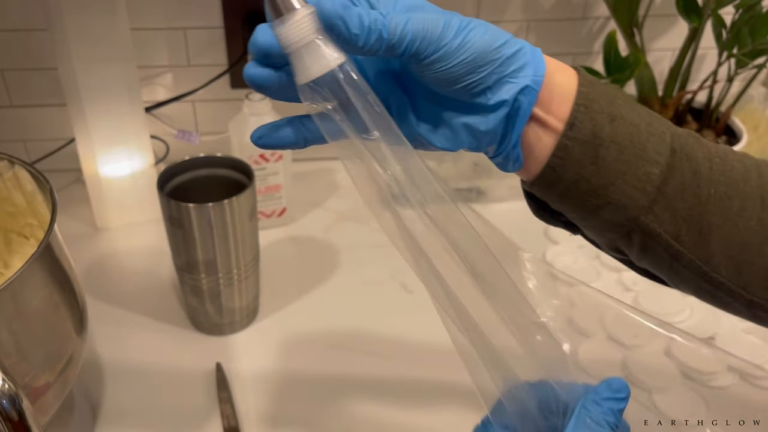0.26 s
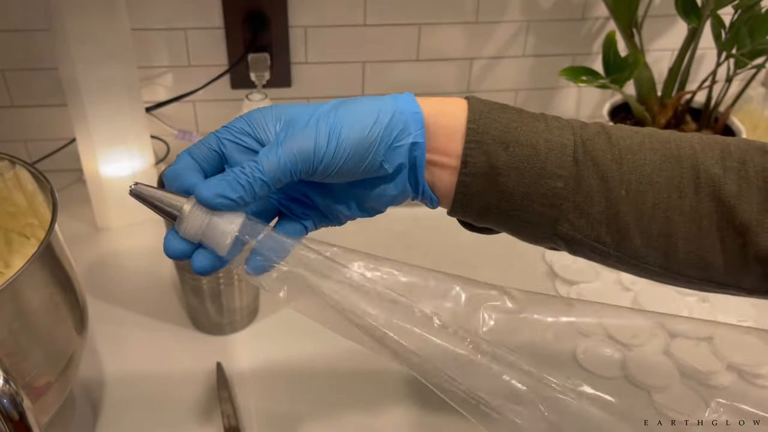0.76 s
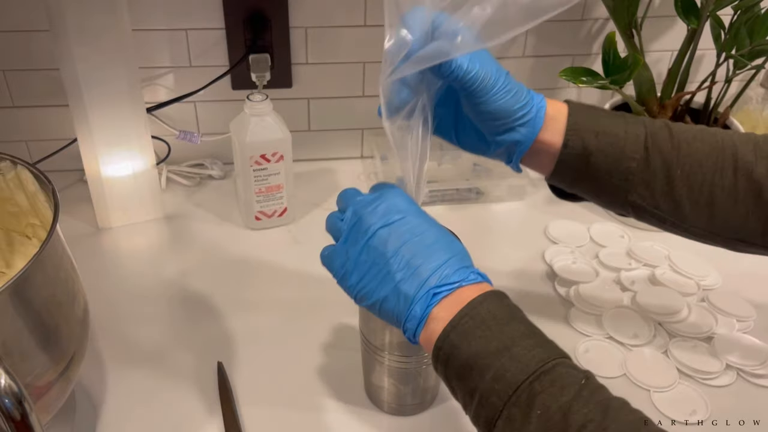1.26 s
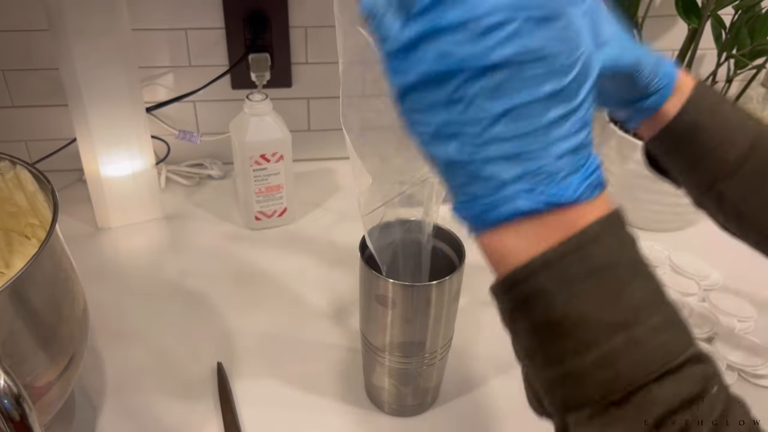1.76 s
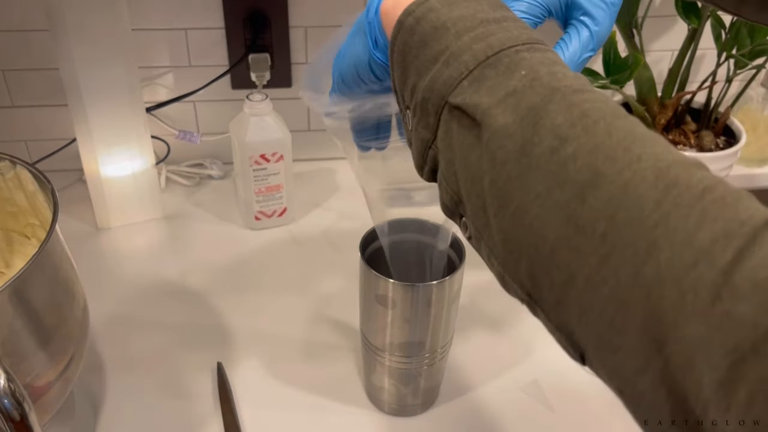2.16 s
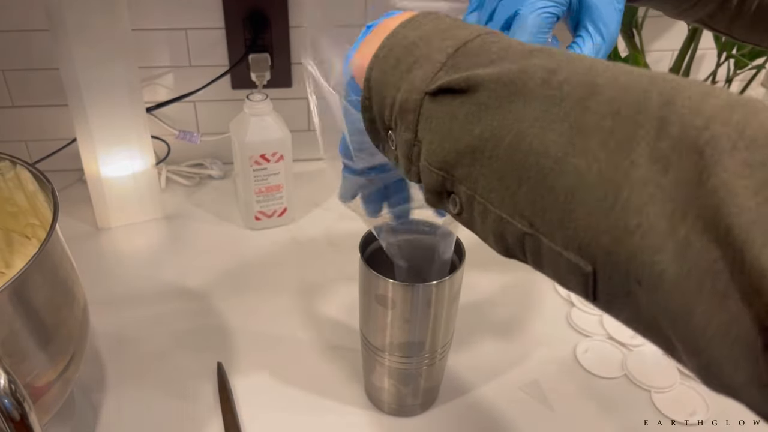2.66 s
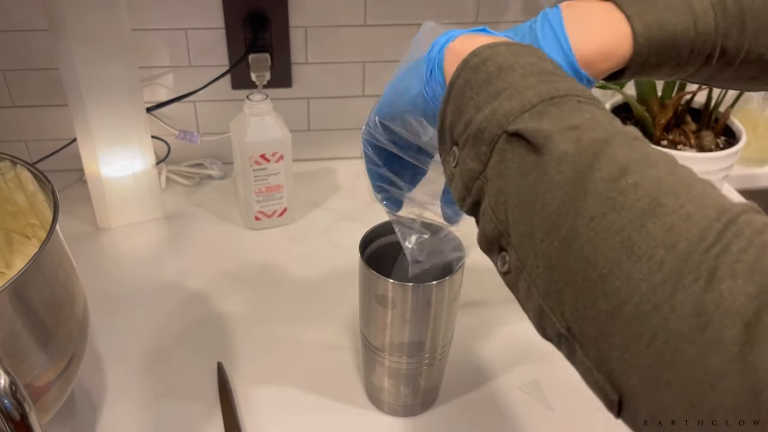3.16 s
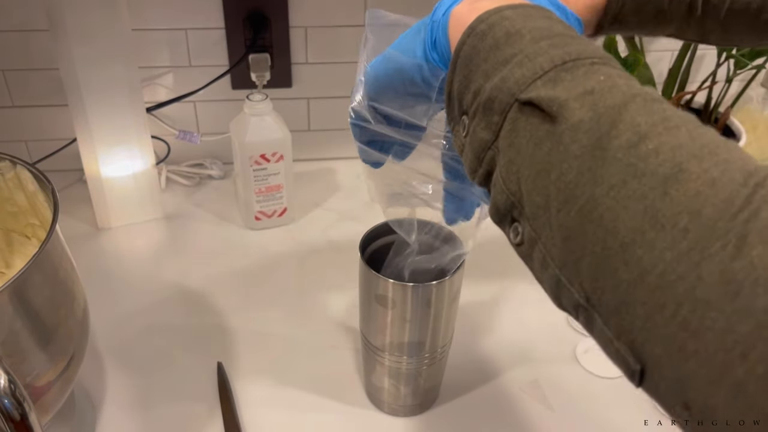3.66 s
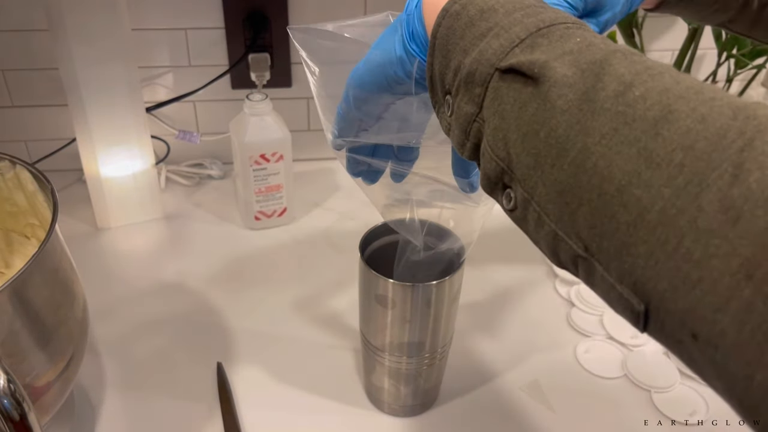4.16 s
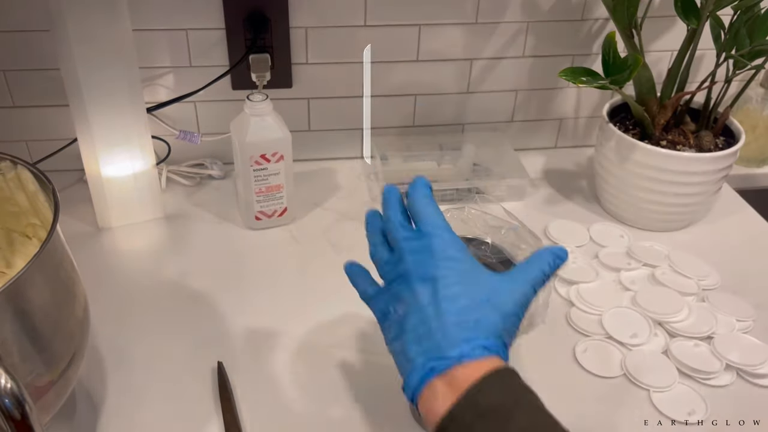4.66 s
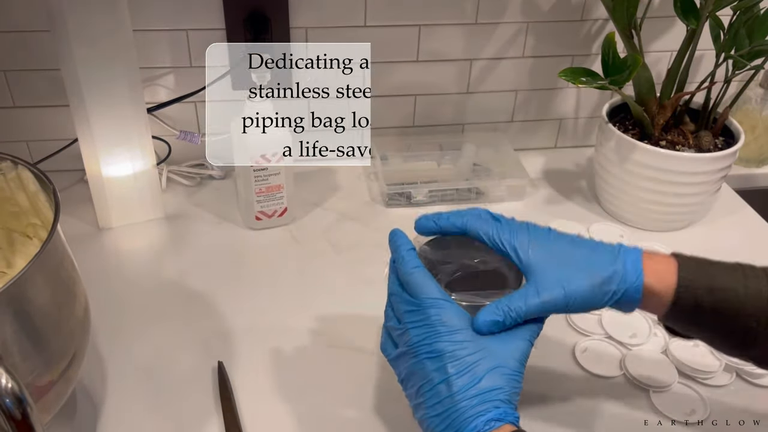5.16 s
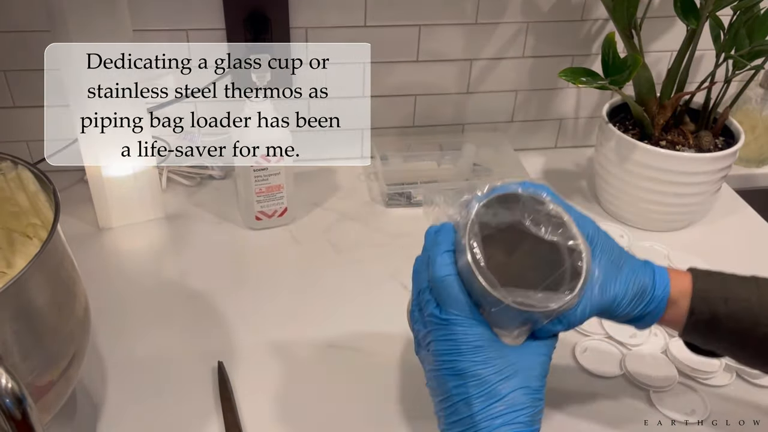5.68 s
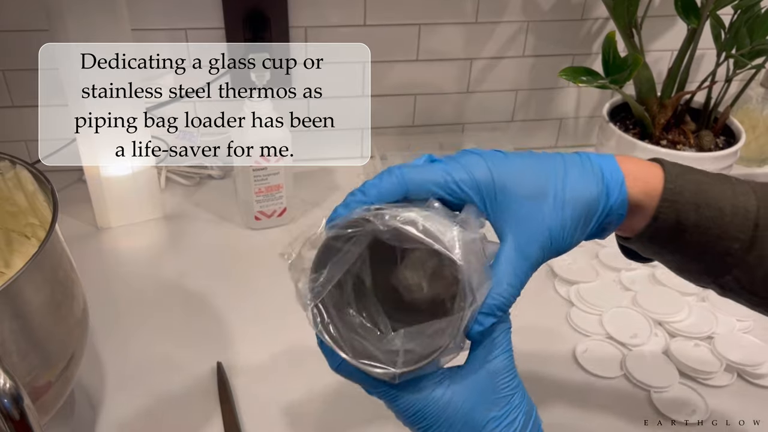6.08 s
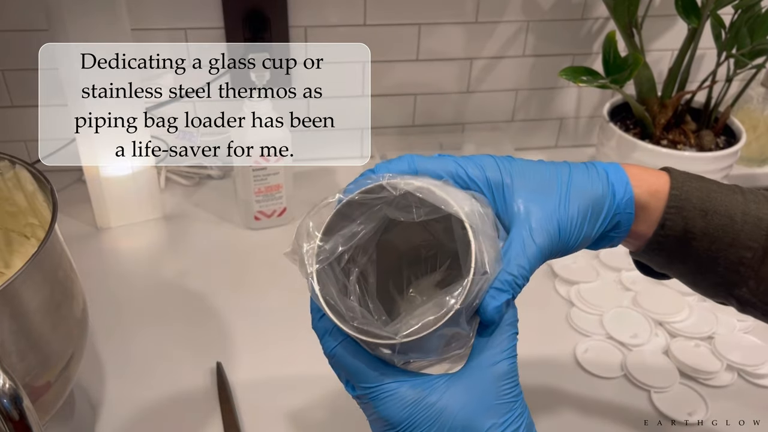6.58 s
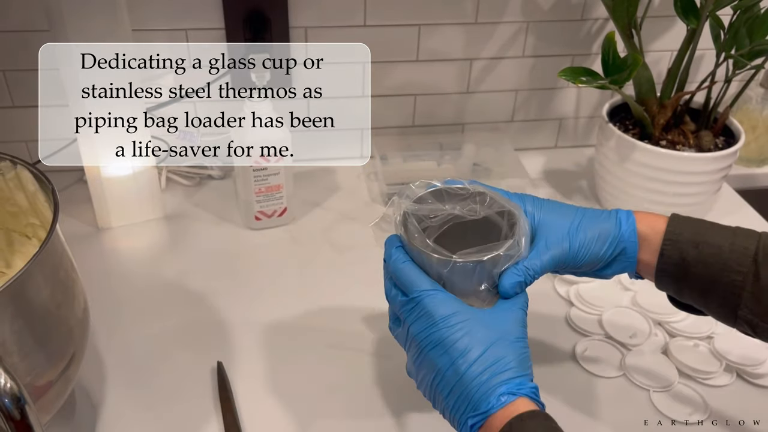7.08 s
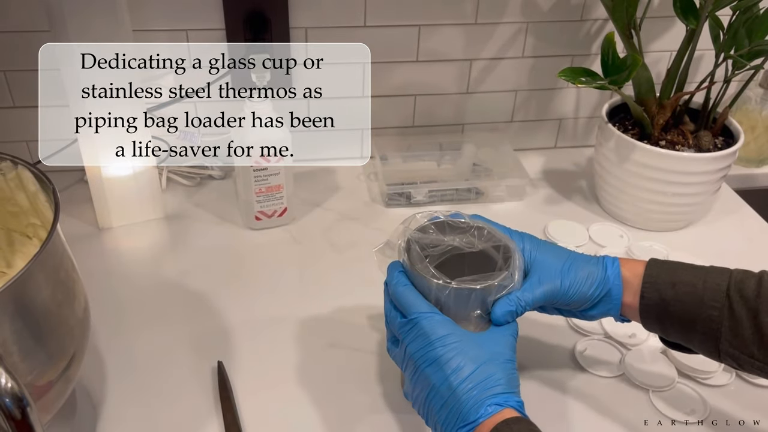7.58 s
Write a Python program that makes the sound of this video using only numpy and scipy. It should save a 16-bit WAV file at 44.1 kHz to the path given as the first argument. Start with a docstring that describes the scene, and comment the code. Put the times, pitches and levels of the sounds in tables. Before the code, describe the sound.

Close, dry crinkles and pops of plastic film start busy, drop almost to nothing, then return as fuller rustling with soft bag flaps and tiny metal ticks from a steel cup. An abrupt edit leads to a short burst of crackle, then quiet handling. Late on, the cup lands with a short hollow metallic thud, followed by a softer contact. Small hard-walled kitchen, low air noise, slightly muffled extreme treble.

```python
"""Thin plastic film crackles and snaps as gloved hands smooth a piping bag: band noise in grains, plus sharp bursts.
The bag's metal tip is lowered into a steel cup and the film folded over the rim: tip and cup are damped modes,
struck by clicks and dragged by friction noise. An edit skips ahead; the cup is set down on a counter, which
answers with dying noise. Feedback delays give a small tiled room; steady air noise and a faint tone make it quiet."""
import sys
import numpy as np
from scipy import signal
from scipy.fft import rfft, irfft, next_fast_len
from scipy.io import wavfile

SR = 44100
rng = np.random.default_rng(int(sys.argv[2]) if len(sys.argv) > 2 else 0)


def put_to_file(sound):
    """Save the sound as 16-bit audio at rate SR, in the file named by the first command-line argument."""
    columns = np.atleast_2d(sound).T  # one column per channel
    safe = np.clip(columns, -1, 1)
    whole_steps = np.round(safe * 32767)
    wavfile.write(sys.argv[1], SR, whole_steps.astype(np.int16))


N = 345303
EDIT_S = 4.537

# How firmly the hands work the film, one list before and one after the edit.
# Each row: time in seconds, crackle level in dB.
HANDLING = [
    [(0.0, -40), (0.34, -57), (0.78, -85), (1.02, -72.5), (1.6, -54.5), (1.78, -61.5), (1.94, -65.5),
     (1.99, -47), (2.07, -39), (2.18, -36.5), (2.28, -37.5), (2.45, -37.5), (2.64, -45), (2.89, -43.5),
     (3.57, -46.5), (4.09, -49), (4.38, -51.5), (4.53, -52.5)],
    [(4.55, -45.5), (4.72, -81), (5.06, -43), (5.26, -46), (5.4, -37.5), (5.5, -39), (5.66, -61),
     (5.86, -66.5), (6.17, -79.5), (6.42, -79.5), (6.8, -66.5), (7.13, -87.5), (7.42, -91), (7.54, -74.5),
     (7.69, -58), (7.83, -51.5)],
]
# The whole bag flaps, strongest in the bass, one list before and one after the edit.
# Each row: time in seconds, level in dB.
FLAPPING = [
    [(0.0, -46), (0.1, -46), (0.95, -72), (1.56, -46.5), (1.74, -66.5), (2.17, -41.5), (2.55, -56),
     (2.78, -39.5), (3.66, -51), (4.48, -48), (4.53, -56.5)],
    [(4.55, -94), (4.58, -75), (4.67, -47), (5.01, -73.5), (5.16, -51), (5.39, -65), (5.54, -56),
     (5.82, -83), (5.89, -70), (7.35, -75), (7.5, -52.5)],
]
# Spectrum of the film. Each row: frequency in Hz, relative band level in dB.
FILM_SPECTRUM = [(60, -19.5), (120, -10.5), (220, -7), (600, -9), (1200, -7.5), (2500, -4.5), (5000, -7.5),
                 (7000, -4), (9000, 0), (14000, 6)]
# Single creases popping; the rows at 1.421 s and 5.278 s are the sharp onsets of a drag and of a knock. Each
# row: start in seconds, peak in dB, pitch in Hz, treble over peak in dB, crackle swell over peak in dB.
SNAPS = [(0.047, -20, 2000, -5, -20), (0.068, -22.5, 4010, -11, -20.5), (0.0885, -10, 2210, -3, -22.5),
         (0.104, -20, 2200, 1.5, -16.5), (0.1204, -19, 3000, -6.5, -21), (0.138, -23.5, 3000, -6, -17.5),
         (0.146, -20, 2580, 5, -21), (0.149, -17, 2900, 6, -20.5), (0.1538, -15, 2600, 6, -21.5),
         (0.1596, -20, 2800, -10.5, -18.5), (0.163, -21, 1600, 0.5, -18.5), (0.172, -21, 2500, 5.5, -15),
         (0.184, -23, 3500, -5.5, -19), (0.192, -20, 2940, 3, -19.5), (0.21, -21, 1900, 14.5, -8.5),
         (0.222, -24, 2000, -8, -20.5), (0.26, -21.5, 1680, -12.5, -12), (0.29, -25.5, 5000, -8, -11.5),
         (0.296, -17.5, 4500, 10, -19.5), (0.308, -24, 2740, 10.5, -15), (0.347, -24.5, 3000, 9, -13),
         (0.352, -15.5, 1850, 9.5, -19), (0.392, -27, 3850, 7, -19.5), (0.423, -21.5, 2670, -3, -12.5),
         (0.446, -21.5, 2000, -15, -8), (0.472, -24, 1450, 8, -6), (0.53, -18, 5070, -1, -20),
         (0.61, -33, 3760, -4, -11), (0.691, -35.5, 1010, -26, -15.5), (0.729, -28.5, 2540, -4, -23.5),
         (0.896, -35.5, 1970, 5.5, -10.5), (0.994, -44, 1370, -37, -17.5), (1.028, -47, 635, -29, -11.5),
         (1.098, -32, 2080, -9, -14), (1.137, -32.5, 2660, -20, -7), (1.174, -41.5, 740, -8, -14.5),
         (1.315, -31, 1620, -6, -21), (1.405, -40.5, 2300, 7, -20), (1.421, -31.5, 770, -12, -17),
         (1.444, -33, 3340, 2, -2.5), (1.534, -21, 1400, -26, -24.5), (1.691, -34.5, 4000, 2.5, -21),
         (1.727, -38, 3220, -10.5, -19.5), (1.973, -37.5, 750, 3.5, -3.5),
         (2.023, -32.5, 2500, -13.5, -9.5), (2.05, -29.5, 2200, -18.5, -11.5),
         (2.093, -22.5, 2470, -10, -3.5), (2.222, -19, 2680, -9.5, -12.5), (2.279, -23, 3820, -17, -17),
         (2.328, -27, 1290, 8, -4.5), (2.399, -18, 1700, -3, -13), (2.412, -22.5, 2700, -15, -15.5),
         (2.464, -25, 1700, -24, -19), (2.594, -25, 1160, -37, -21.5), (2.641, -24, 2570, -26, 4),
         (2.738, -27.5, 2070, 8, -11), (2.753, -26.5, 2000, 4.5, -12.5), (2.781, -17.5, 1690, -2, -16),
         (2.787, -19, 1830, 14, -16.5), (2.829, -24.5, 2450, -1, -7), (2.846, -26.5, 900, -21, -12.5),
         (2.91, -14.5, 3560, 11, -30.5), (2.943, -20.5, 1670, -12.5, -18), (2.975, -22, 2280, -15, -15.5),
         (3.007, -28, 1320, 1, -9), (3.022, -27.5, 2070, -2.5, -8), (3.047, -25, 1630, -8, -8.5),
         (3.059, -26, 2490, 4, -10.5), (3.068, -30, 2200, 9.5, -13), (3.106, -28, 1290, 6.5, -7.5),
         (3.126, -30, 2700, -1, -11.5), (3.198, -23.5, 1220, -42, -3), (3.227, -21.5, 1220, 8, -5),
         (3.273, -24.5, 1770, 14, -13.5), (3.29, -24.5, 1200, 12, -24.5), (3.312, -16.5, 3300, 3, -23),
         (3.405, -25, 900, 1.5, -28.5), (3.437, -29, 1740, -26, -18.5), (3.488, -26.5, 1210, -7.5, -9),
         (3.525, -21.5, 1300, 12.5, -7.5), (3.641, -31, 1270, 3, -13), (3.709, -29, 2800, -15.5, -14),
         (3.728, -17, 1250, 11, -24), (3.763, -25.5, 2310, 2, -15), (3.804, -24, 2000, -5, -8),
         (3.821, -21.5, 2470, 5, -6), (3.875, -23.5, 1320, 10.5, -19.5), (3.918, -22, 2400, 7.5, -22),
         (3.932, -26.5, 3200, -19, -11.5), (4.03, -32.5, 3900, 11, -1), (4.05, -26.5, 1590, 15.5, -13),
         (4.082, -27.5, 1250, -20, -21), (4.228, -20, 1450, -9, -4.5), (4.258, -26, 1260, -3, 0),
         (4.307, -26, 2780, -1, -16.5), (4.425, -23.5, 2570, -15, 1.5), (4.533, -26.5, 3280, -1, -2),
         (4.758, -42, 665, -33, -19), (5.11, -34.5, 1940, 1, -11), (5.135, -28, 2300, 13, -4.5),
         (5.168, -27, 2080, 14.5, -9), (5.211, -25, 2720, -8, -17), (5.233, -23.5, 1630, 13.5, -14.5),
         (5.278, -32, 790, -17, -20), (5.345, -30.5, 2620, -1, -19), (5.435, -28.5, 2800, -15, 0.5),
         (5.463, -26, 2000, -2, -15), (5.468, -18.5, 2500, 4, -14.5), (5.499, -19.5, 4730, 7, -10),
         (5.51, -20.5, 2500, 1, -18), (5.525, -23.5, 2730, -19, -14), (5.543, -22.5, 3900, 0, -19.5),
         (5.607, -27, 2750, 0, -16.5), (5.873, -45.5, 730, -22, -6.5), (5.904, -40, 2680, -15, -18.5),
         (5.936, -32.5, 2660, -15, -13.5), (6.002, -41, 682, -5.5, -10.5), (6.555, -34, 3540, 5.5, -15),
         (6.777, -47.5, 1510, 12, -7.5), (6.808, -37.5, 2960, 10.5, -13.5),
         (6.849, -40.5, 1850, -10, -16.5), (6.873, -37.5, 4020, 1, -13.5), (6.998, -48, 3650, 8.5, -16.5),
         (7.416, -48.5, 2190, -16.5, -23)]
# The tip drags on the cup floor; the last two rows are a knock and the cup's second contact.
# Each row: start in seconds, rise in seconds, then drive before FRICTION_DB
# of third mode, air column, second mode, upper modes, each in dB.
DRAGS = [(1.433, 0.0069, -56, -35.5, -32, -53), (1.53, 0.0096, -35, -34, -36.5, -44),
         (1.589, 0.024, -42, -46.5, -52.5, -54), (2.105, 0.021, -25, -43.5, -40.5, -32.5),
         (2.139, 0.0085, -36, -38.5, -17.5, -27), (2.274, 0.013, -30.5, -46, -39.5, -32.5),
         (2.339, 0.0062, -34, -47, -24.5, -39), (2.422, .01, -34, -36.5, -35, -38),
         (2.756, 0.012, -29.5, -52, -32.5, -39), (2.954, 0.0075, -59, -36.5, -34.5, -47),
         (3.226, 0.0056, -44, -37.5, -28.5, -45), (3.311, 0.0071, -52, -33, -35, -51),
         (3.563, 0.0084, -58, -50, -44, -33.5), (3.725, 0.0051, -58, -54.5, -21.5, -46),
         (4.007, 0.014, -39.5, -52, -45, -37), (4.079, 0.0026, -61, -70.5, -26, -44),
         (4.105, 0.054, -43, -58, -47, -48), (4.42, 0.015, -35, -36, -31.5, -36),
         (4.459, 0.023, -46, -50, -45, -37), (5.277, 0.0052, -69, -35.5, -55.5, -61),
         (7.728, 0.0053, -41, -32, -32.5, -71)]
# Modes of cup floor and air, one list per drive column of DRAGS.
# Each row: frequency in Hz, relative level in dB, T60 in seconds.
CUP_FLOOR_MODES = [
    [(2695, 0, .08)],
    [(521, 0, .1), (465, -7, .12), (640, -7, .1)],
    [(1207, 0, .055)],
    [(3908, -2, .1), (5660, -8, .12), (6397, -11, .1), (9272, -13, .1)],
]
# The tip strikes the cup wall; the last row is the cup's second contact with the counter.
# Each row: time in seconds, then blow to low wall, rim modes, mid wall,
# high wall, side modes, tip, each in dB.
STRIKES = [(1.438, -43, -40, -35, -50, -62, -56), (1.533, -75, -75, -75, -60, -41, -75),
           (2.14, -43, -41, -37, -46, -50, -52), (2.342, -55, -60, -46, -46, -60, -33),
           (3.727, -55, -34, -50, -56, -60, -32), (4.075, -65, -60, -43, -46, -48, -65),
           (4.428, -60, -55, -48, -52, -39, -55), (7.729, -70, -44, -70, -70, -56, -80)]
# Modes of the cup wall, one list per blow column of STRIKES except the tip.
# Each row: frequency in Hz, relative level in dB, T60 in seconds.
CUP_WALL_MODES = [
    [(1007, -6, 1.0), (1521, -5, 1.6), (1750, -9, 2.8)],
    [(2333, -2, .5), (2386, -6, 1.9)],
    [(3310, 0, .56), (6019, -14, .7), (7410, -12, .15), (7568, -11, .15)],
    [(4062, -5, 1.0), (4128, -8, 1.2), (4660, -2, 1.5), (5577, -11, 1.3)],
    [(2725, -4, .6), (3900, 1, .3)],
]
# Modes of the metal tip. Each row: frequency in Hz, relative level in dB, T60 in seconds.
TIP_MODES = [(8253, 2, .25), (8969, 0, .6), (9168, -3, .4), (9507, -14, .35)]
# Modes of the cup base. Each row: frequency in Hz, relative level in dB, T60 in seconds.
CUP_BASE_MODES = [(226, -22, .4), (330, -20, .3), (440, -14, .3), (518, -11, .35), (596, -14, .3),
                  (760, -17, .25), (920, -13, .25), (1068, 2.5, .17), (1190, -12, .2), (2018, -1, .4),
                  (2350, -19, .3), (2600, -16, .15), (2660, -14, .15), (3360, -17, .25), (3465, -12, .3),
                  (3625, -12, .35), (3705, -18, .3), (5185, -19, .35), (5485, -11, .28), (5555, -13, .28),
                  (5620, -19, .2), (7764, -19, .25), (7905, -18, .3), (8005, -15, .28), (8255, -21, .25)]
# Spectrum of the air noise. Each row: frequency in Hz, relative density in dB.
ROOM_TONE_SPECTRUM = [(20, 5), (55, 7.5), (130, 5), (250, 2.5), (450, -5), (1000, -26.5), (2500, -33),
                      (6000, -45.5), (9500, -26), (10500, -42.5), (16000, -55.5)]

# film
TREBLE_DB, TREBLE_FOLLOWS = -6, 0.054   # treble over crackle at -55.5 dB; change in dB per dB of crackle
LOOSEN_S, FLAP_FOLLOWS = .012, 0.63     # decay of a snap's swell; share of it, in dB, taken up by the flapping
DULL_SWELL = 0.6                        # share of a snap's missing treble, in dB, that its swell lacks too
GRAIN_TAIL_S, SLIDE_DB, SLIP_S, SLIP_DB = .0007, -7, .009, 1.0
# cup and counter
FRICTION_DB = -23
SET_DOWN_S, TOUCH_DB, CHATTER_DB, CHATTER_S = 7.522, -20, -54, .008
SETTLE_S, PRESSED_S, PRESS_S, PRESSED_DB = 0.012, 0.048, .025, -11
ROCK_S, ROCK_DB, ROCK_CUT_HZ = 7.729, -22.5, 450
THUD_DB, THUD_S, CRACK_DB, CRACK_S = -23, 0.04, -41, 0.025
# room
ROOM_T60_S, WALL_CUT_HZ, ROOM_DB = 0.45, 13300, -15.5
RING_ROOM_DB, BASE_ROOM_DB = -14, -5    # share of the cup's ringing, and of the base's, that the walls return, in dB
ROOM_TONE_DB, HUM_HZ, HUM_DB = -62.5, 401, -69.5
# stereo pickup and overall tone
SHADE_LOW_HZ, SHADE_HIGH_HZ, SHADE_DB = 900, 8500, -13.5
LIFT_HZ, LIFT_WIDTH_HZ, LIFT_DB = 8800, 1500, 0      # LIFT_DB: level of the added resonance
BASS_CUT_HZ, ROLL_OFF_HZ, CUTOFF_HZ = 40, 9800, 16600
FAINT_TOP_DB, FAINT_TOP_CUT_HZ = -15, 12300


def from_db(db):
    """Amplitude factor of a level."""
    return 10 ** (np.asarray(db) / 20)


def to_db(gain):
    """Level of an amplitude factor."""
    return 20 * np.log10(gain)


def rms_one(x):
    """Scale to unit RMS."""
    return x / np.sqrt(np.mean(x ** 2) + 1e-20)


def at_hz(points, hz):
    """Interpolate (Hz, value) rows over log frequency."""
    points = np.array(points)
    return np.interp(np.log(hz), np.log(points[:, 0]), points[:, 1])


def band(x, low_hz, high_hz):
    """Butterworth band-pass."""
    sos = signal.butter(2, [low_hz, high_hz], "band", fs=SR, output="sos")
    return signal.sosfilt(sos, x + 1e-18)


def decay(x, tail_s):
    """Let each impulse die away exponentially."""
    return signal.lfilter([1], [1, -np.exp(-1 / (tail_s * SR))], x)


def drift(rate_hz):
    """Slow random wander of spread 1, computed at every 40th sample."""
    r = np.exp(-80 * np.pi * rate_hz / SR)
    noise = rng.standard_normal(N // 40 + 2002)
    slow = signal.lfilter([1], [1, -2 * r, r * r], noise)[2000:]
    return np.interp(np.arange(N) / 40, np.arange(len(slow)), rms_one(slow))


def ring(drive, hz, t60_s):
    """Damped resonator: a unit click sets a sine of height 1 ringing."""
    r, w = from_db(-60 / (t60_s * SR)), 2 * np.pi * hz / SR
    return signal.lfilter([0, np.sin(w)], [1, -2 * r * np.cos(w), r * r], drive + 1e-18)


def clicks(times_s, db):
    """Single-sample impulses."""
    out = np.zeros(N)
    out[np.round(np.asarray(times_s) * SR).astype(int)] = from_db(db)
    return out


def in_shots(curves):
    """One curve up to the edit, the other after it."""
    t = np.arange(N) / SR
    before, after = (np.interp(t, *np.transpose(rows)) for rows in curves)
    return np.where(t < EDIT_S, before, after)


def loosening():
    """A snap frees the film: the crackle swells at once and dies away, each side of the edit on its own."""
    s, snap_db, _, treble_db, swell_db = np.transpose(SNAPS)
    missing_db = np.minimum(treble_db, 0)
    freed = np.array([clicks(s, snap_db + swell_db + share * missing_db) for share in (0, DULL_SWELL)])
    cut = round(EDIT_S * SR)
    return np.hstack([decay(freed[:, :cut], LOOSEN_S), decay(freed[:, cut:], LOOSEN_S)])


def crackle(per_s, spread_db, tail_s, slips_per_s, slip_s, slip_db, hiss_db, patchy_db):
    """Tiny creases buckle, each in its own part of the spectrum, over the hiss of film sliding on gloves;
    slips start sharply, die away and swell both."""
    handling_db = in_shots(HANDLING)
    loosened, loosened_treble = loosening()
    level_db = to_db(from_db(handling_db) + loosened)
    dulling_db = to_db(from_db(handling_db) + loosened_treble) - level_db
    treble_db = TREBLE_DB + TREBLE_FOLLOWS * (level_db + 55.5) + dulling_db
    flap_db = in_shots(FLAPPING) + FLAP_FOLLOWS * (level_db - handling_db) - level_db

    busy = np.clip((level_db + 65.5) / 22, .4, 1)      # light handling mostly slides, firm handling creases
    slips = (rng.random(N) < slips_per_s / SR) * rng.exponential(1, N)
    slips = slips * from_db(slip_db + handling_db - level_db) * busy
    swell = 1 + decay(slips, slip_s)
    sizes = from_db(spread_db * np.minimum(rng.exponential(1, N), 4))
    grains = sizes * (rng.random(N) < per_s * swell / SR)

    edges_hz = np.geomspace(60, 16500, 21)
    centre = rng.uniform(4.55, 23.9, N)      # band number where each grain is strongest
    white = rng.standard_normal((2, N))
    out = np.zeros(N)
    for k, (low_hz, high_hz) in enumerate(zip(edges_hz, edges_hz[1:])):
        hz = np.sqrt(low_hz * high_hz)
        flap = at_hz([(350, 0.71), (1300, 0.43)], hz)
        treble = at_hz([(4500, 0.2), (7500, 0.96)], hz)
        bursts = decay(grains * np.exp(-.5 * ((centre - k) / 1.93) ** 2), tail_s)
        slide = from_db(hiss_db + patchy_db * drift(7.6)) * swell ** (1 - 0.2 * flap)
        texture = (busy * (1 - 1.3 * flap) * rms_one(bursts) + slide) * white[k % 2]
        gain = from_db(level_db + flap * flap_db + treble * treble_db + at_hz(FILM_SPECTRUM, hz))
        out += gain * rms_one(band(texture, low_hz, high_hz))
    return out


def room_tone():
    """Steady air noise, alike on both sides in the bass, with a faint appliance tone."""
    hz = np.maximum(np.arange(N // 2 + 1) * SR / N, 1)
    width = from_db(at_hz([(150, -15.0), (600, 2.5), (4000, 1.0)], hz))
    spectra = rfft(rng.standard_normal((2, N))) * from_db(at_hz(ROOM_TONE_SPECTRUM, hz))
    mid, side = irfft(spectra * [np.ones(len(hz)), width], N)
    air = from_db(ROOM_TONE_DB + 0.72 * drift(8.4)) * rms_one(mid + side * [[1], [-1]])
    hum = from_db(HUM_DB + 1.0 * drift(6)) * np.sin(2 * np.pi * HUM_HZ * np.arange(N) / SR)
    return air + hum


def snaps(tear_s, body_s, crack_s, after_s, after_db, edge_db):
    """A crease pops: a sharp edge, a ragged burst around its pitch, a bright crack on top; then the film settles."""
    out, t = np.zeros(N), np.arange(2400) / SR
    peak = round(tear_s * SR)      # the crease tears briefly before it lets go
    shape = np.exp(-abs(t - tear_s) / [[body_s], [crack_s]]) + from_db(after_db) * np.exp(-t / after_s)
    for s, db, hz, treble_db, _ in SNAPS:
        burst = rng.standard_normal((2, 2400)) * shape
        burst[:, peak] = from_db(edge_db)
        body = band(band(burst[0], hz * 0.4, hz * 2.0), hz * 0.55, hz * 2.07)
        crack = band(burst[1], 9400, 16000)
        pop = body / abs(body).max() + from_db(treble_db) * crack / abs(crack).max()
        at = round(s * SR) - peak
        kept = (s > EDIT_S) | (s + t < EDIT_S)      # the edit cuts a pop short
        out[at:at + 2400] += kept * from_db(db) * pop
    return out


def room(x):
    """Twelve feedback delays a side, duller on every round."""
    size = next_fast_len(N + SR)
    w = 2 * np.pi * np.arange(size // 2 + 1) / size
    keep = np.exp(-2 * np.pi * WALL_CUT_HZ / SR)
    dull = (1 - keep) / (1 - keep * np.exp(-1j * w))
    out = np.zeros((2, len(w)), complex)
    lags = (rng.uniform(.008, .045, 24) * SR).astype(int)
    for k, lag in enumerate(lags):
        loop = dull * from_db(-60 * lag / SR / ROOM_T60_S) * np.exp(-1j * w * lag)
        out[k % 2] += loop / (1 - loop) * (-1) ** (k // 2)
    return irfft(out * rfft(x, size), size)[:, :N]


def drags():
    """Friction noise swells and fades, driving the damped modes of the cup floor; so do a knock and a contact."""
    out, rough, t = np.zeros(N), rng.standard_normal(N), np.arange(9000) / SR
    for k, modes in enumerate(CUP_FLOOR_MODES):
        push = np.zeros(N + len(t))
        for s, rise_s, *levels_db in DRAGS:
            at = round(s * SR)
            push[at:at + len(t)] += from_db(levels_db[k] + FRICTION_DB) * t / rise_s * np.exp(1 - t / rise_s)
        out += sum(from_db(db) * ring(push[:N] * rough, hz, t60_s) for hz, db, t60_s in modes)
    return out * (abs(np.arange(N) / SR - EDIT_S - .2) > .2)      # silent for 0.4 s from the edit


def strikes():
    """Each strike rings wall and tip; the edit silences what was struck before it."""
    s, *blows_db = np.transpose(STRIKES)
    rings = []
    for shot in (s < EDIT_S, s >= EDIT_S):
        rings.append(sum(ring(clicks(s[shot], blow_db[shot] + db), hz, t60_s)
                         for modes, blow_db in zip(CUP_WALL_MODES + [TIP_MODES], blows_db)
                         for hz, db, t60_s in modes))
    return rings[0] * (np.arange(N) < EDIT_S * SR) + rings[1]


def set_down():
    """A touch and a short chatter drive all base modes, neighbours in opposite phase; pressing down damps them."""
    t = np.arange(N) / SR - SET_DOWN_S
    chatter = from_db(CHATTER_DB) * rng.standard_normal(N) * (t > 0) * np.exp(-abs(t) / CHATTER_S)
    touch = signal.lfilter(np.hanning(5)[1:-1], [1], clicks([SET_DOWN_S], TOUCH_DB))
    rock = band(clicks([ROCK_S], ROCK_DB), 240, ROCK_CUT_HZ)      # it rocks once more, softly
    drive = np.array([touch + chatter, rock])
    hit, soft = sum((-1) ** k * from_db(db) * ring(drive, hz, t60_s)
                    for k, (hz, db, t60_s) in enumerate(CUP_BASE_MODES))
    settle = 1 - 0.36 * np.exp(-abs(t) / SETTLE_S)      # the base lands edge first, then flat
    pressed = np.clip((t - PRESSED_S) / PRESS_S + .5, 0, 1)
    return hit * settle * from_db(PRESSED_DB * pressed) + soft


def counter():
    """The slab under the cup: dense modes heard as dying noise, at the landing and weaker at the rock."""
    out, t = np.zeros(N), np.arange(N) / SR
    noise = rng.standard_normal((2, N))
    thud = from_db(THUD_DB) * rms_one(band(noise[0], 157, 770))
    crack = from_db(CRACK_DB) * rms_one(band(noise[1], 1000, 9000))
    for s, db in [(SET_DOWN_S, 0), (ROCK_S, -10)]:
        since = np.maximum(t - s, 0)
        rise = 1 - np.exp(-since / 0.0043)
        out += from_db(db) * rise * (thud * np.exp(-since / THUD_S) + crack * np.exp(-since / CRACK_S))
    return out


def scene():
    """Sum the sources, hear them at two ports, add echoes and room tone."""
    film = crackle(per_s=700, spread_db=5, tail_s=GRAIN_TAIL_S, slips_per_s=26, slip_s=SLIP_S,
                   slip_db=SLIP_DB, hiss_db=SLIDE_DB, patchy_db=4.0)
    pops = snaps(tear_s=.001, body_s=.0014, crack_s=.0013, after_s=.006, after_db=-14, edge_db=9)
    rings = strikes() + drags()
    base = set_down()
    dry = film + pops + rings + base + counter()

    # the device's body shades the far port in the middle band, and that port hears about one sample later
    shade = from_db(SHADE_DB) * band(dry, SHADE_LOW_HZ, SHADE_HIGH_HZ)
    far = signal.lfilter([0, .85, .15], [1], dry - shade)
    close = np.array([dry + shade, far])

    to_walls = dry - (1 - from_db(RING_ROOM_DB)) * rings - (1 - from_db(BASE_ROOM_DB)) * base
    to_walls = band(to_walls, 260, 15000)      # the walls return little bass
    before = np.arange(N) < EDIT_S * SR        # the edit cuts the echoes short
    wet = room(to_walls * before) * before + room(to_walls * ~before)
    return close + from_db(ROOM_DB) * wet + room_tone()


def record(dry):
    """A treble band is lifted; above it the sound falls to a faint, fading top, then ends."""
    peak = signal.lfilter(*signal.iirpeak(LIFT_HZ, LIFT_HZ / LIFT_WIDTH_HZ, fs=SR), dry)
    x = dry + from_db(LIFT_DB) * peak
    x = signal.sosfilt(signal.butter(1, BASS_CUT_HZ, "high", fs=SR, output="sos"), x)
    top_band = signal.butter(4, [ROLL_OFF_HZ, FAINT_TOP_CUT_HZ], "band", fs=SR, output="sos")
    faint_top = from_db(FAINT_TOP_DB) * signal.sosfilt(top_band, x)
    x = signal.sosfilt(signal.cheby1(10, .5, ROLL_OFF_HZ, fs=SR, output="sos"), x) + faint_top
    return signal.sosfilt(signal.cheby2(12, 70, CUTOFF_HZ, fs=SR, output="sos"), x)


dry = scene()
out = record(dry)
put_to_file(out)
```